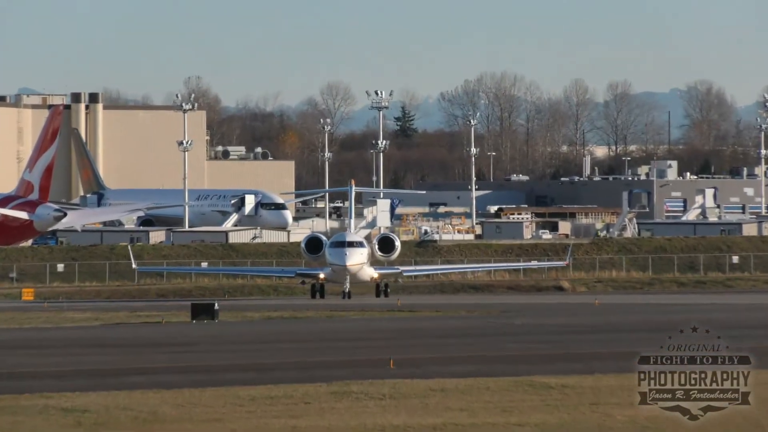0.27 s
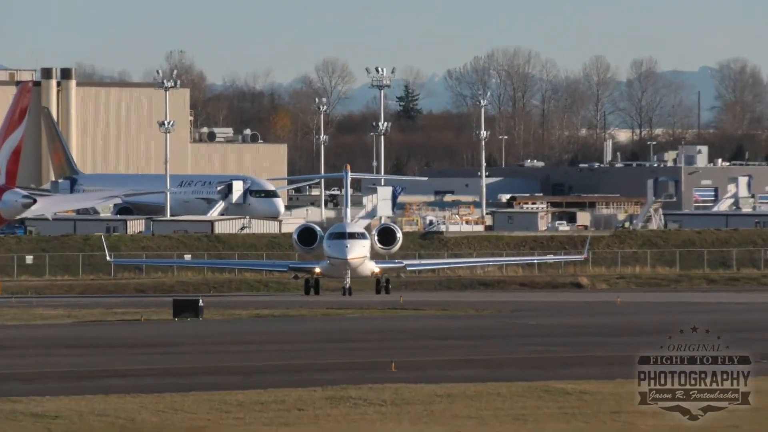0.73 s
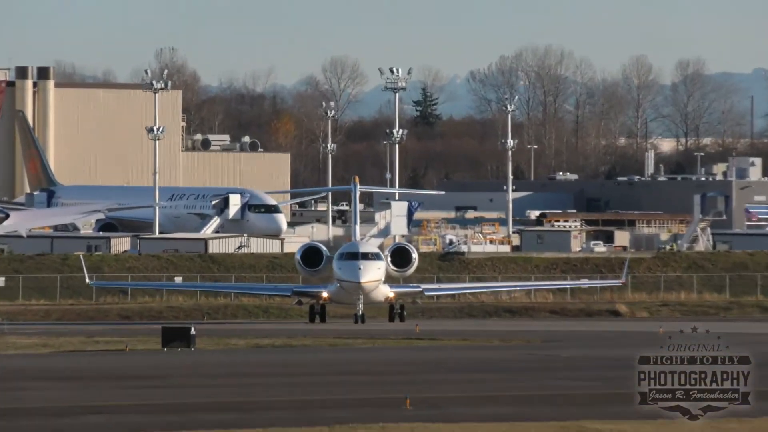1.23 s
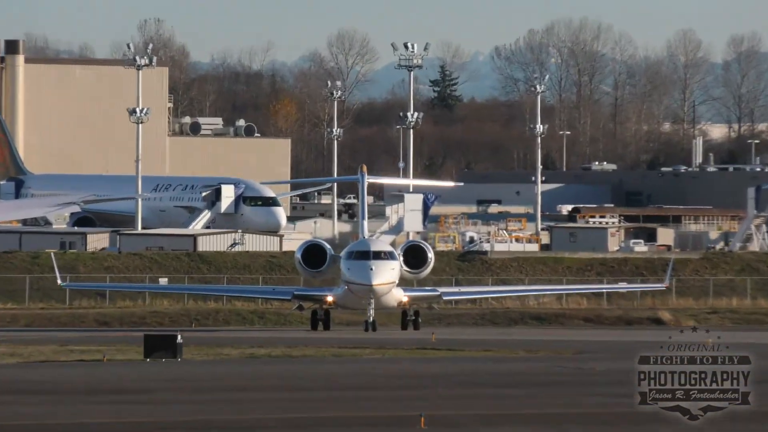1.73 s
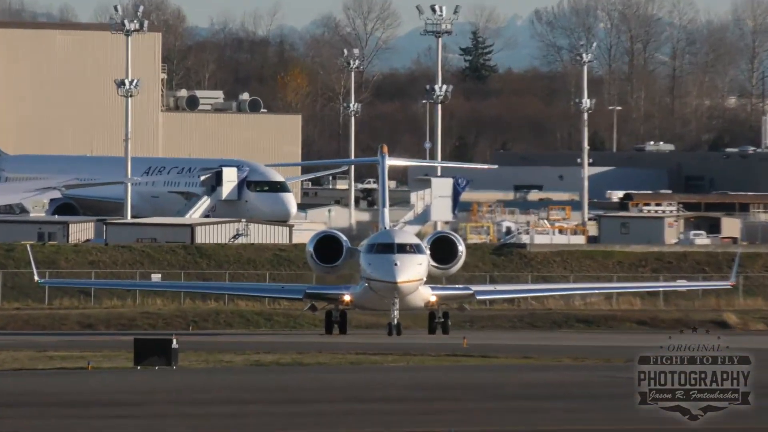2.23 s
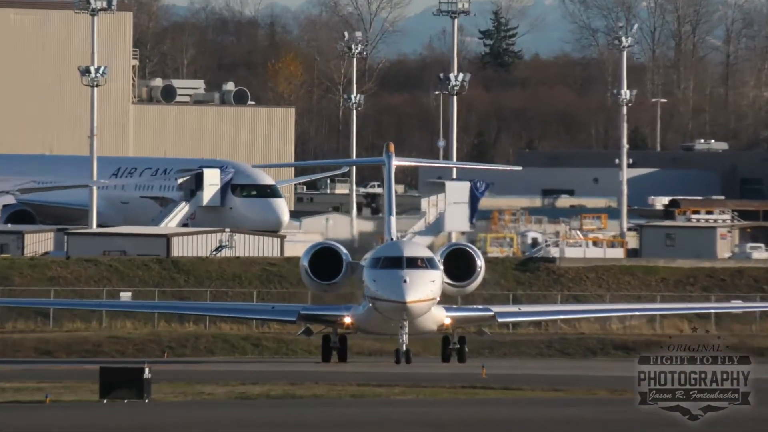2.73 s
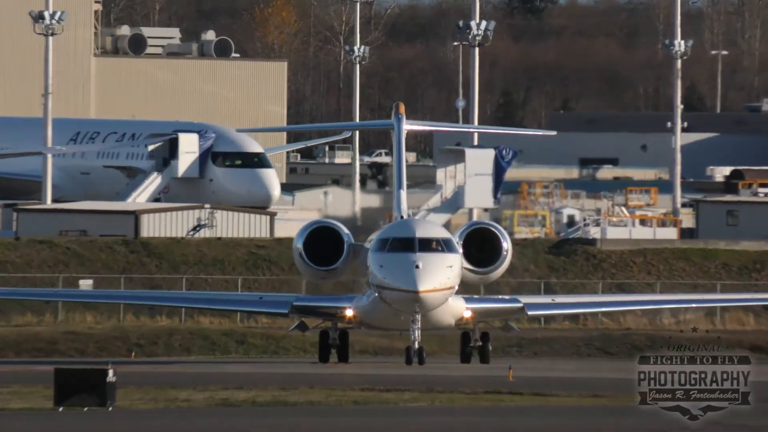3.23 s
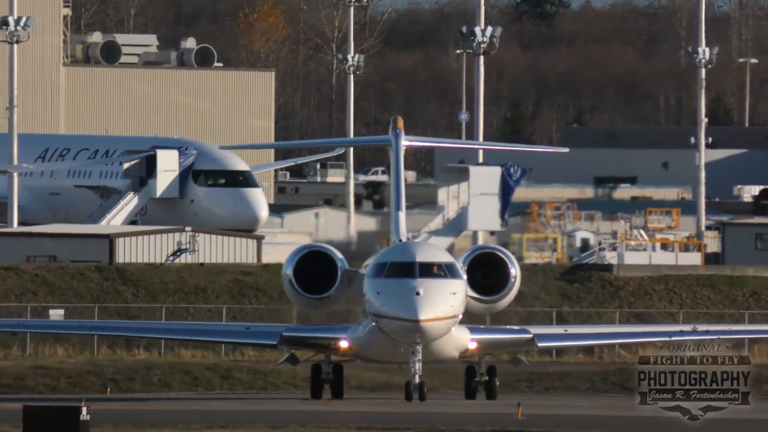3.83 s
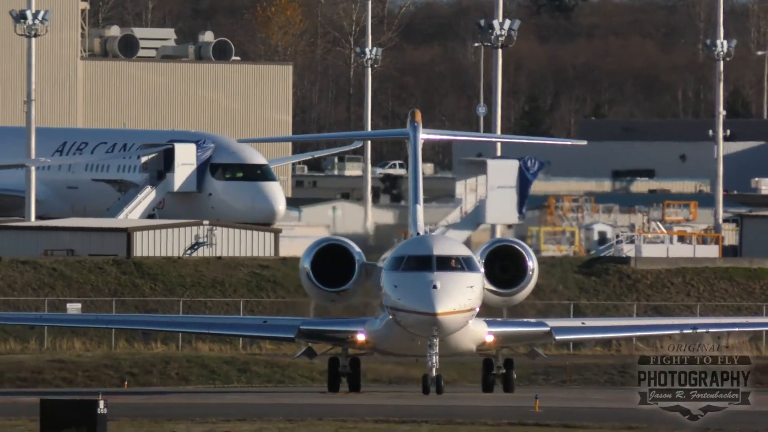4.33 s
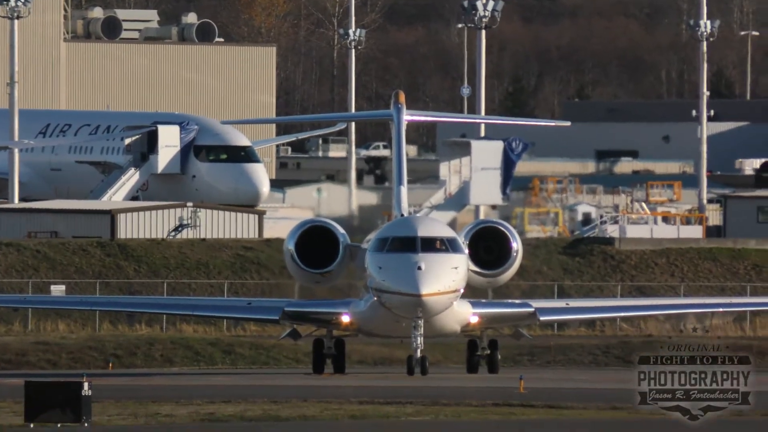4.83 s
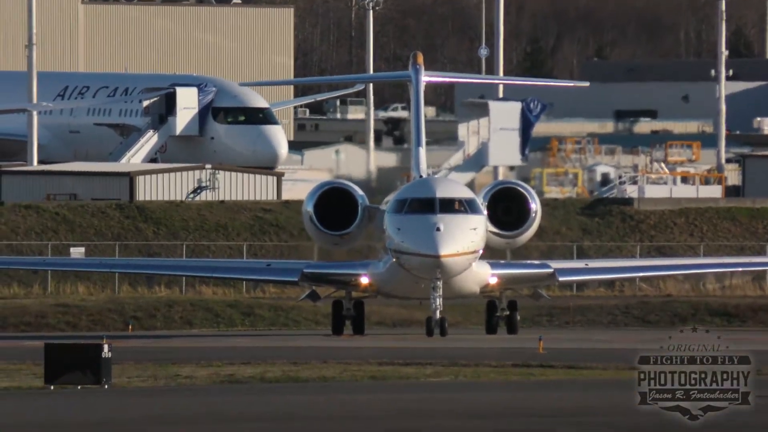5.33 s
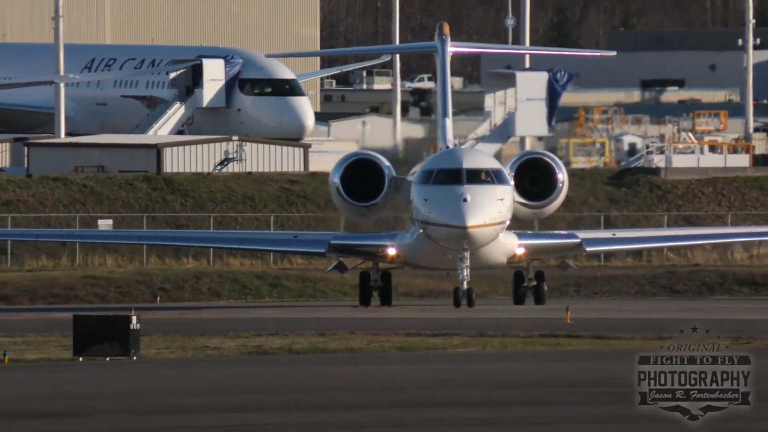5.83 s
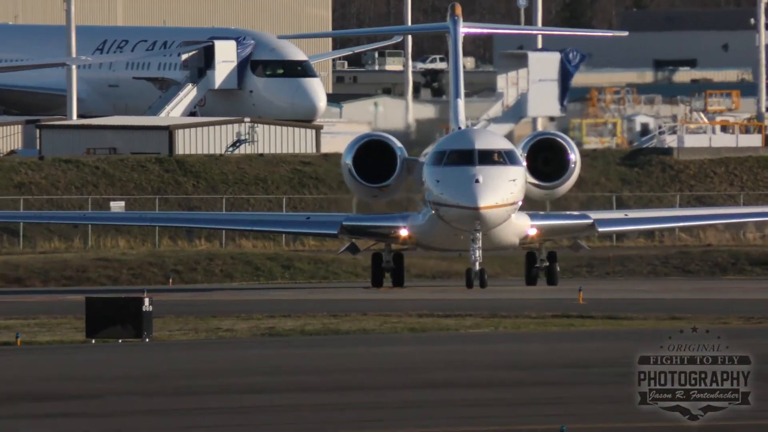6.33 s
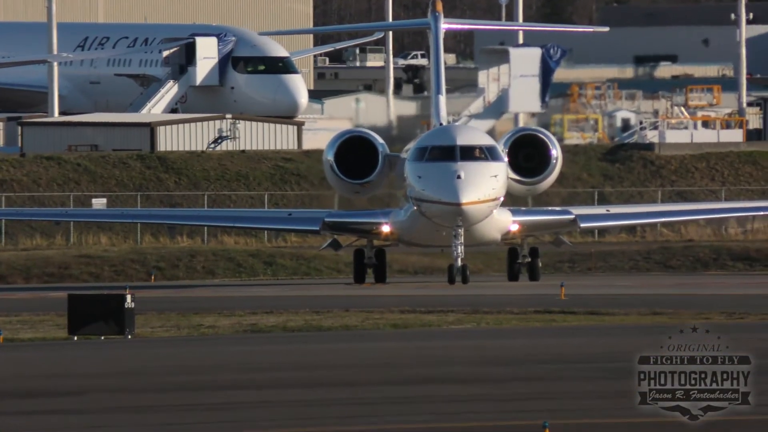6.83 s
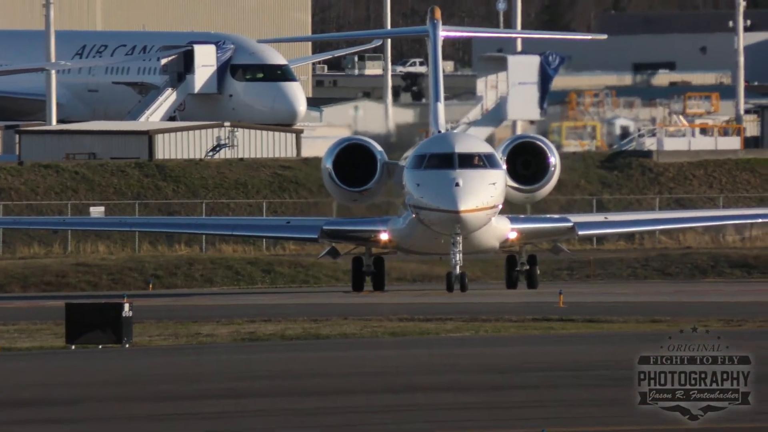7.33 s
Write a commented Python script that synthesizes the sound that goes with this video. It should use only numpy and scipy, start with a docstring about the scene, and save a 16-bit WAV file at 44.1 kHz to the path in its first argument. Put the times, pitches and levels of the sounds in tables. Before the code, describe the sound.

For about 7.6 seconds a twin-engined business jet taxis slowly toward a distant microphone on an open airfield. The roar is present from the first instant and never stops. Its core is a hollow, noisy mid-range howl around 1.5 kHz, wandering slightly lower and higher, surrounded by broad intake roar. Low exhaust roar fills out gradually from 2 seconds, is fullest around 4.5 to 5, then recedes after 6.5. Two nearly matched engine hums near 500 Hz beat against each other, with a deeper shaft hum below; one fades late. A thin blade whine just above 5 kHz flickers, clearer around 2.5, 4, 6 and the end, weak near 4.5 and 5.6. Fan hiss breathes irregularly, brighter near 1 second and again around 7. Treble is scant, the image nearly central, with upper mids leaning slightly right.

```python
"""Airfield: a twin-engined jet taxis slowly toward a distant microphone.
Intake ducts, exhaust and fan roar as shaped noise split into registers; one intake resonance howls.
Each engine adds sines locked to its shaft: blade whine, low shaft hum, a geared hum and faint stage tones.
The long path leaves little treble. Level curves and slow chance follow the eddies: sounds swell and fade."""
import sys
import numpy as np
from scipy import signal
from scipy.fft import rfft, irfft, next_fast_len
from scipy.io import wavfile

SR = 44100
rng = np.random.default_rng(int(sys.argv[2]) if len(sys.argv) > 2 else 0)


def put_to_file(sound):
    """Save the sound as 16-bit audio at rate SR, in the file named by the first command-line argument."""
    columns = np.atleast_2d(sound).T  # one column per channel
    safe = np.clip(columns, -1, 1)
    whole_steps = np.round(safe * 32767)
    wavfile.write(sys.argv[1], SR, whole_steps.astype(np.int16))


N = 334719
PADDED = next_fast_len(N)
HZ = np.maximum(np.arange(PADDED // 2 + 1) * SR / PADDED, 1)

BLADES = 31
GEAR_RATIO = 3.0165
HUM_FADING_DB = 1.5
STOPBAND_EDGE_HZ = 15950

# Low intake humps: start_s, near_770_hz_db, near_1000_hz_db, near_1300_hz_db
DUCT_LOW_LEVELS = [(0.0, -35, -33, -33), (0.4, -30.5, -32.0, -31.0), (0.85, -33.5, -35.5, -30),
                   (1.3, -33, -33.5, -31.0), (1.75, -31.5, -30.5, -29.5), (2.2, -30, -28, -30.5),
                   (2.65, -30.5, -29.5, -30), (3.1, -29.5, -31.5, -31.5), (3.55, -30.5, -29.5, -33),
                   (4.0, -32, -29, -34), (4.45, -26, -29.5, -28), (4.9, -30, -27, -30),
                   (5.35, -30, -26, -28), (5.8, -31, -28.5, -31.5), (6.25, -29.5, -30, -28.5),
                   (6.7, -31.0, -28.5, -29), (7.15, -33.5, -30.5, -31), (7.59, -32, -30.5, -32)]
# Upper intake humps: start_s, near_1560_hz_db (before its split), shoulder_1720_hz_db, near_2060_hz_db, edge_db
DUCT_UPPER_LEVELS = [(0.0, -26.5, -28.5, -30, -35.5), (0.4, -26.5, -30, -35, -37.5),
                     (0.85, -29, -29.5, -31.5, -34), (1.3, -29, -29.5, -28.5, -35.5),
                     (1.75, -28.5, -28.5, -31, -33), (2.2, -31.5, -32.5, -31.5, -35.5),
                     (2.65, -26, -32, -32.5, -35.5), (3.1, -28.5, -31, -34, -37.5),
                     (3.55, -29, -29, -27.5, -36), (4.0, -28.5, -28.5, -33, -36.0),
                     (4.45, -28.5, -36, -30, -41.5), (4.9, -32, -32.5, -36.5, -39),
                     (5.35, -29, -30.5, -30.5, -33), (5.8, -27.5, -30.5, -28.5, -33.5),
                     (6.25, -27.5, -31.5, -29.5, -30), (6.7, -25.5, -29, -30, -33),
                     (7.15, -26.5, -28, -29, -34), (7.59, -23.5, -31.5, -31, -32)]
# Intake spectrum: freq_hz, relative_density_db
DUCT_COLOUR = [(665, -25.5), (710, -5.5), (1090, -6), (1125, -12), (1280, -5), (1750, -6), (1800, -4.5),
               (2250, -6), (2340, -11.5), (2500, -31.5)]
# Broad intake resonances: centre_hz, width_hz, above_colour_db (negative: valley)
INTAKE_MODES = [(769, 27, 2.5), (989, 90, 4), (1710, 64, 3.5), (2047, 190, 7), (1885, 76, 5),
                (2603, 160, 3.5), (2860, 120, 2), (3935, 120, -1), (3470, 420, 5), (4240, 140, -2.5),
                (4450, 160, 5), (4860, 200, 3)]
# Wandering centre of the strongest intake resonance: start_s, centre_hz
HOWL_CENTRE = [(0, 1601), (2.4, 1540), (3.5, 1580), (4.6, 1541), (5.5, 1590), (6.4, 1540), (7.59, 1515)]
# Burner and jet pipe: start_s, level_db (before the part offsets)
EXHAUST_LEVEL = [(0.0, -30.5), (2.05, -28.5), (4.65, -27.5), (5.2, -28), (6.5, -30.5), (7.59, -35)]
# Offsets from that level: low_roar_db, high_roar_db
EXHAUST_PARTS_DB = [-5, -3.5]
# Rumble under the exhaust roar: start_s, depth_db, body_db
RUMBLE_LEVELS = [(0, -49, -38.5), (1.2, -47, -38), (2, -46, -35.5), (2.8, -45, -36), (3.6, -48, -33.5),
                 (4.4, -49, -34.5), (5, -47, -37), (5.8, -50, -36), (6.5, -48.5, -37), (7.59, -52.5, -41.5)]
# Exhaust spectrum: freq_hz, relative_density_db
EXHAUST_COLOUR = [(12, -41), (30, -21), (50, -14), (80, -4.5), (105, -1), (125, 0), (148, -0.5),
                  (162, -10.5), (185, -12), (230, -5.5), (270, -3), (440, -3), (490, -4.5), (560, -5.5),
                  (635, -6), (690, -6), (740, -30.5)]
# Fan hiss: start_s, near_2500_hz_db, near_2900_hz_db, near_3400_hz_db, near_3800_hz_db,
# near_4200_hz_db, near_4700_hz_db, top_edge_db
FAN_LEVELS = [(0.0, -39, -44, -49, -50, -53, -48, -54), (0.04, -36, -42, -43, -47, -50, -46, -56),
              (0.23, -38, -40, -41, -45.5, -49.5, -49.5, -57.5),
              (0.95, -34.5, -37.5, -41, -40.5, -48, -44, -48),
              (1.27, -34, -36, -41.5, -40.5, -45, -42.5, -50),
              (1.69, -41.5, -37.5, -41, -44.5, -51, -49, -53),
              (1.86, -40, -38.5, -44, -46, -49, -46.5, -50), (2.24, -39, -45, -45, -46, -49, -49.5, -55.5),
              (2.51, -43, -42, -43.5, -46, -48, -49, -55.5),
              (2.96, -36, -39.5, -40.5, -48, -53, -47, -53.5),
              (3.21, -35.5, -40, -44, -45.5, -48, -49, -53.5),
              (3.47, -37, -41, -39, -42, -47, -48.5, -58.5),
              (3.89, -34, -36.5, -39.5, -45, -51, -47, -52.5),
              (4.14, -40.5, -38, -45, -45.5, -48, -46.5, -52), (4.46, -38, -37, -43, -42, -53, -47, -51.5),
              (4.61, -42, -38.5, -46, -47, -56, -50, -54),
              (4.97, -44, -42.5, -43.5, -46, -47, -46.5, -53.5),
              (5.24, -42.5, -45, -44.5, -48, -50, -51, -56.5),
              (5.58, -40.5, -43, -47, -51, -51, -54, -59.5), (6.07, -37.5, -38, -43, -45, -49, -45, -49.5),
              (6.85, -36.5, -40, -41, -43, -45, -47, -52.5),
              (6.96, -36.5, -40, -39.5, -45.5, -46, -50.5, -57.5),
              (7.38, -37.5, -39.5, -43, -44.5, -50, -49.5, -55), (7.59, -38, -38, -41, -42, -48, -45, -55)]
# Fan spectrum: freq_hz, relative_density_db
FAN_COLOUR = [(2200, -19), (2400, -0.5), (2950, -1), (3150, -6), (4100, -13), (5000, -15.5), (5150, -17),
              (5600, -22.5), (6250, -31.5), (7000, -38.5), (9000, -72)]
# Core shaft speed of each engine: start_s, turns_per_s
SHAFT_A = [(0, 169.6), (1, 169.28), (2.5, 168.5), (3.6, 168.12), (4.2, 168.1), (5.6, 168.3), (7.59, 168.25)]
SHAFT_B = [(0, 167.84), (1.5, 167.68), (3.5, 167.06), (5, 166.97), (6, 166.74), (7.59, 167.12)]
# Blade whine of each engine, before random drift: start_s, level_rms_db
WHINE_A = [(0.0, -70), (0.45, -64), (0.8, -55), (1.0, -55), (1.25, -52.5), (1.65, -58), (1.85, -53),
           (2.1, -68), (2.3, -62), (2.5, -49), (2.8, -50), (3.2, -52), (3.5, -59), (3.7, -53),
           (3.95, -48.5), (4.25, -50), (4.42, -65), (4.6, -58), (4.8, -63), (5.05, -56), (5.3, -57),
           (5.6, -72), (5.95, -51), (6.2, -51), (6.4, -54.5), (6.6, -52), (6.85, -54), (7.0, -60),
           (7.2, -51), (7.59, -49)]
WHINE_B = [(0.0, -49), (0.35, -52), (0.65, -55.5), (1.0, -50.5), (1.3, -56), (1.8, -57), (2.2, -58),
           (2.6, -70), (3.3, -68), (3.6, -63), (3.95, -64), (4.2, -54), (4.35, -56), (4.58, -70),
           (4.8, -56), (5.2, -53), (5.4, -54), (5.6, -66), (5.8, -57), (6.0, -52), (6.2, -58), (6.4, -67),
           (6.75, -53), (7.0, -58), (7.2, -64), (7.59, -55)]
# Hum of a part geared to each shaft, before drift: start_s, engine_a_rms_db, engine_b_rms_db
GEARED_HUM = [(0, -45, -41), (.9, -45, -41), (1.5, -43, -41.5), (1.95, -43.5, -38.5), (2.5, -46, -41),
              (3.0, -49, -40), (3.3, -45, -42.5), (3.75, -43, -40), (4.2, -47, -45), (4.5, -54, -42.5),
              (5.1, -47, -38), (5.4, -45.5, -39), (5.8, -50, -42.5), (6.3, -57, -41.5), (6.9, -57, -43),
              (7.2, -62, -42.5), (7.59, -64, -49)]
# Hum of both shafts, before drift: shaft_multiple, engine_a_rms_db, engine_b_rms_db
HUM_ORDERS = [(1, -48.5, -48), (2, -58.5, -47.5)]
# Faint tones of other blade rows, before drift: shaft_multiple, engine_a_rms_db, engine_b_rms_db
STAGE_TONES = [(35.49, -77, -87.5), (38, -92, -81)]
# Faint hiss above the engines, before flicker: start_s, level_db
TREBLE_LEVEL = [(0.0, -73.5), (2.7, -63.5), (5.1, -66), (6.0, -67.5), (7.2, -84), (7.59, -81)]
# Treble spectrum: freq_hz, relative_density_db
TREBLE_COLOUR = [(6800, -15.5), (7600, 0.5), (15000, 0), (17000, 0.5)]
# Scattered sound spectrum: freq_hz, relative_density_db
SCATTER_COLOUR = [(1700, -37.5), (2300, 3.5), (3500, 0), (5000, -13.5), (6500, -37), (8000, -43.5),
                  (16000, -50.5)]
# Stereo lean: freq_hz, left_minus_right_db
LEAN = [(1800, 0), (2100, -.05), (2750, -.9), (3450, -.95), (4500, -.6), (5900, 0)]


def intake_roar():
    """Intake ducts: noise coloured by broad duct resonances, plus the howl of the strongest one."""
    main_db, *upper_db = in_time(DUCT_UPPER_LEVELS)
    # main hump: split between broad noise and howl
    levels_db = [*in_time(DUCT_LOW_LEVELS), main_db - 5.5, *upper_db]
    joins_hz = [894, 1117, 1459, 1585, 1789, 2120]
    broad = register_noise(DUCT_COLOUR, joins_hz, levels_db, fading_db=0.0, modes=INTAKE_MODES)
    return broad + howl(main_db - 3.0, width_hz=100)


def howl(level_db, width_hz):
    """Strongest intake resonance: narrow-band noise on a carrier at its wandering centre."""
    lowpass = signal.butter(2, width_hz / 2, fs=SR, output="sos")
    in_phase, quadrature = signal.sosfilt(lowpass, rng.standard_normal((2, N)))
    phase = 2 * np.pi * np.cumsum(in_time(HOWL_CENTRE)[0]) / SR
    return from_db(level_db) * rms_one(in_phase * np.cos(phase) + quadrature * np.sin(phase))


def exhaust_roar():
    """Burner and jet pipe: low-frequency noise, two rumble registers under two roar registers."""
    roar_db = in_time(EXHAUST_LEVEL)[0]
    levels_db = in_time(RUMBLE_LEVELS) + [roar_db + part_db for part_db in EXHAUST_PARTS_DB]
    return register_noise(EXHAUST_COLOUR, [75, 180, 420], levels_db, fading_db=0.4)


def fan_hiss():
    """Fan: high noise with the intake resonances, combed by a ground bounce."""
    joins_hz = [2672, 3100, 3566, 3954, 4326, 5133]
    hiss = register_noise(FAN_COLOUR, joins_hz, in_time(FAN_LEVELS), fading_db=0.15, modes=INTAKE_MODES)
    return ground_echo(hiss, share=.22)


def ground_echo(x, share):
    """Weak bounce off the tarmac; its delay wanders with the air and shifts the bands of colour."""
    lag_samples = SR * (.0028 + .0003 * drift(.5))
    bounce = np.interp(np.arange(N) - lag_samples, np.arange(N), x)
    return (x + share * bounce) / np.sqrt(1 + share ** 2)


def engine_tones(shaft, whine, engine):
    """One engine: blade rate, geared part, shaft unbalance and other blade rows, locked to the shaft."""
    turns_per_s, whine_db = in_time(shaft)[0], in_time(whine)[0]
    # eddies stretch the path: whine pitch and level blur
    whine_hz = BLADES * turns_per_s * (1 + .00013 * drift(9))
    out = tone(whine_hz, whine_db + 1.6 * drift(10))
    geared_db = in_time(GEARED_HUM)[engine]
    out += tone(GEAR_RATIO * turns_per_s, geared_db + HUM_FADING_DB * drift(4))
    for multiple, *levels_db in HUM_ORDERS:
        out += tone(multiple * turns_per_s, levels_db[engine] + HUM_FADING_DB * drift(2.2))
    for multiple, *levels_db in STAGE_TONES:
        out += tone(multiple * turns_per_s, levels_db[engine] + 3.5 * drift(1.2))
    return out


def treble_hiss():
    """Faint, nearly flat noise above the engines, with a quick level flicker."""
    level_db = in_time(TREBLE_LEVEL)[0] + 2.0 * drift(25)
    return register_noise(TREBLE_COLOUR, [], [level_db], fading_db=.5)


def scattered_sound():
    """Trace of scattered sound: steady noise, opposite in sign in the two channels."""
    return register_noise(SCATTER_COLOUR, [3800], [-60, -72], fading_db=0.0) * [[1], [-1]]


def register_noise(colour, joins_hz, levels_db, fading_db, modes=()):
    """Coloured noise cut at the joins; each register follows its level plus random fading."""
    shape_db = at_hz(colour, HZ)
    for centre_hz, width_hz, top_db in modes:
        shape_db = shape_db + top_db / (1 + (2 * (HZ - centre_hz) / width_hz) ** 2)
    in_range = (HZ > colour[0][0]) * (HZ < colour[-1][0])
    shaped = rfft(rng.standard_normal(PADDED)) * from_db(shape_db) * in_range
    # share of each frequency above a join; crossover a few percent wide
    above = [1] + [np.clip(.5 + 12 * np.log(HZ / hz), 0, 1) for hz in joins_hz] + [0]
    out = np.zeros(N)
    for low, high, level_db in zip(above, above[1:], levels_db):
        register = rms_one(irfft(shaped * (low - high), PADDED)[:N])
        out += register * from_db(level_db + fading_db * drift(4.7))
    return out


def tone(hz, level_db):
    """Sine on a pitch curve at a given rms level, random start phase."""
    turns = np.cumsum(hz) / SR + rng.random()
    return np.sqrt(2) * from_db(level_db) * np.sin(2 * np.pi * turns)


def drift(rate_hz):
    """Slow chance: noise at every 40th sample through a double one-pole low-pass; spread 1."""
    pole = np.exp(-2 * np.pi * rate_hz * 40 / SR)
    noise = rng.standard_normal(N // 40 + 3002)
    slow = signal.lfilter([1], [1, -2 * pole, pole ** 2], noise)[3000:]  # drop the run-in
    return np.interp(np.arange(N) / 40, np.arange(len(slow)), rms_one(slow - slow.mean()))


def in_time(rows):
    """Columns of a curve table, one value per sample."""
    start_s, *columns = np.transpose(rows)
    return [np.interp(np.arange(N) / SR, start_s, column) for column in columns]


def at_hz(points, hz):
    """Spectrum table read on a log-frequency axis."""
    points_hz, points_db = np.transpose(points)
    return np.interp(np.log(hz), np.log(points_hz), points_db)


def from_db(db):
    """Amplitude gain of a level in dB."""
    return 10 ** (np.asarray(db) / 20)


def rms_one(x):
    """Scaled to rms 1."""
    return x / np.sqrt(np.mean(x ** 2) + 1e-20)


def scene():
    """Jet almost straight ahead, upper mids leaning a little right, plus scattered sound."""
    jet = intake_roar() + exhaust_roar() + fan_hiss()
    jet += engine_tones(SHAFT_A, WHINE_A, engine=0) + engine_tones(SHAFT_B, WHINE_B, engine=1)
    jet += treble_hiss()
    lean = from_db(at_hz(LEAN, HZ) / 2 * np.array([[1], [-1]]))
    pair = irfft(rfft(jet, PADDED) * lean, PADDED)[:, :N]
    return pair + scattered_sound()


def record(dry):
    """Steep low-pass cuts the top; filter state is settled at the first sample."""
    sos = signal.cheby2(14, 70, STOPBAND_EDGE_HZ, fs=SR, output="sos")
    settled = signal.sosfilt_zi(sos)[:, None] * dry[:, :1]
    return signal.sosfilt(sos, dry, zi=settled)[0]


dry = scene()
out = record(dry)
put_to_file(out)
```